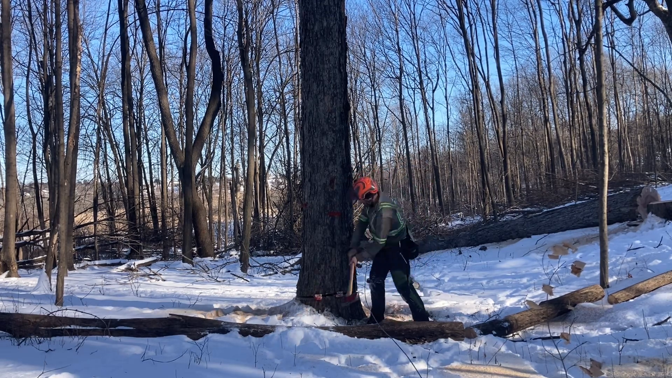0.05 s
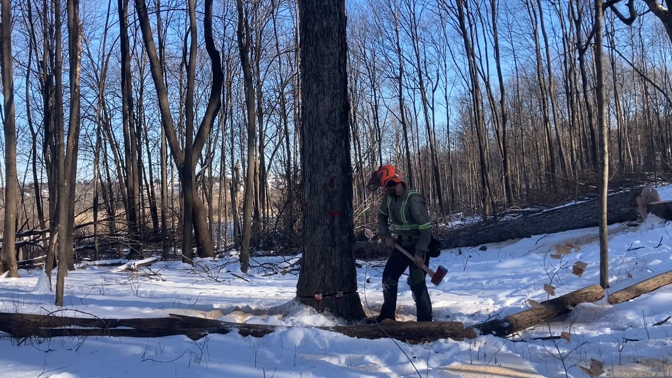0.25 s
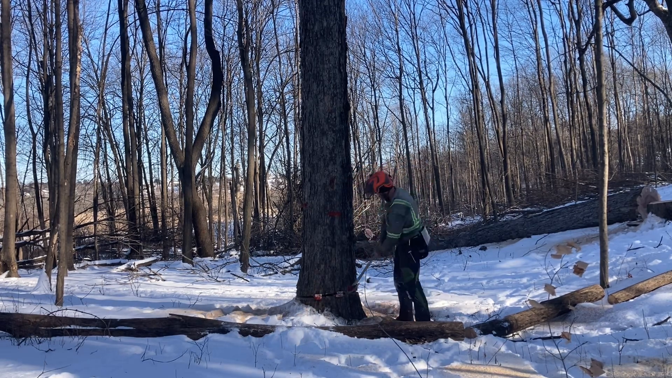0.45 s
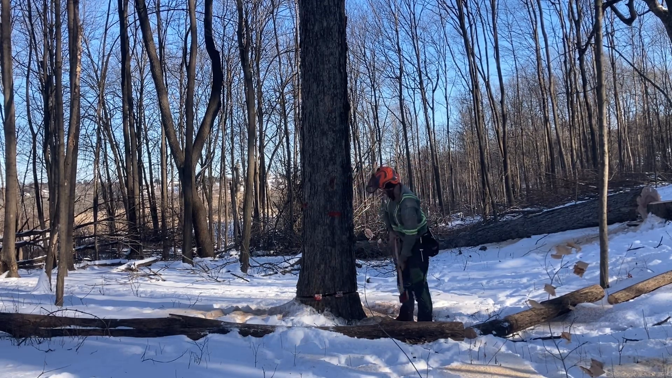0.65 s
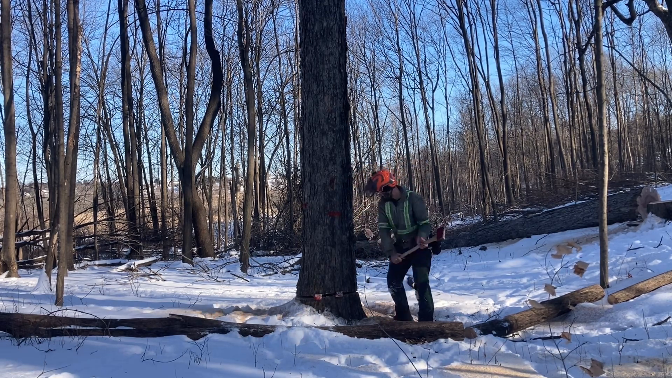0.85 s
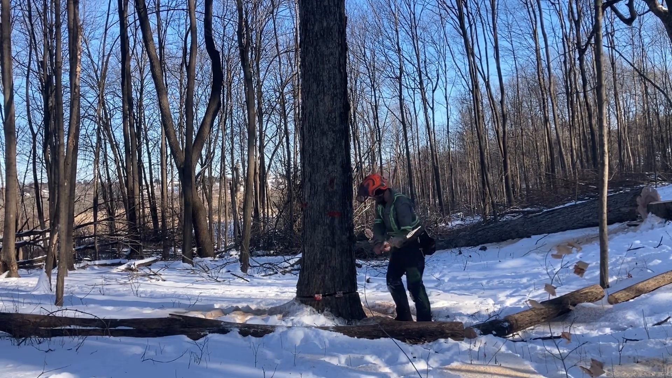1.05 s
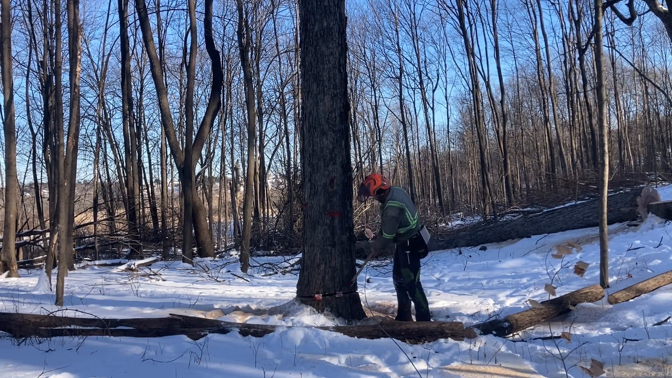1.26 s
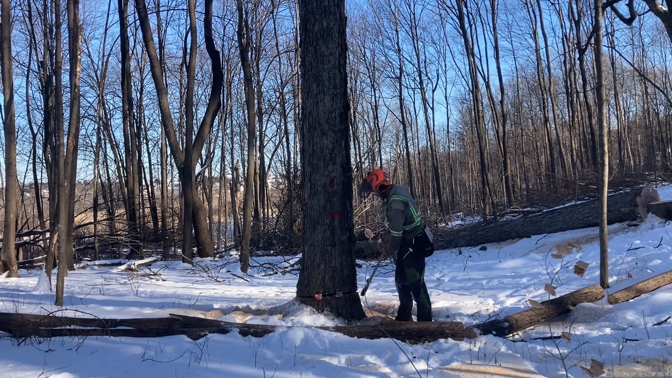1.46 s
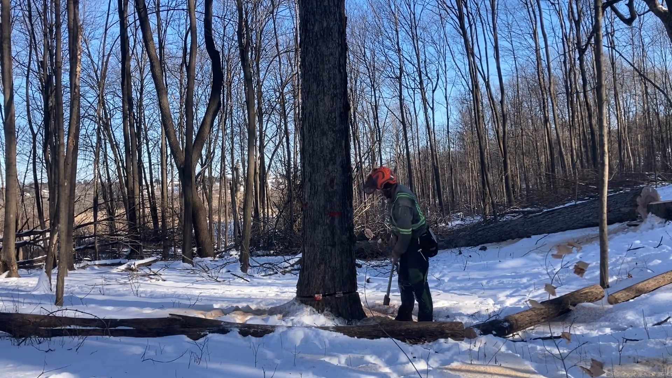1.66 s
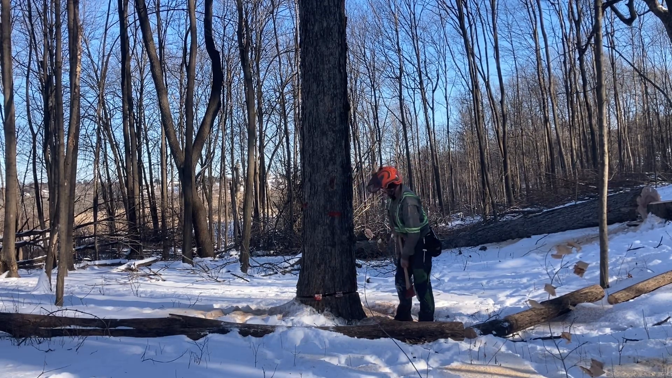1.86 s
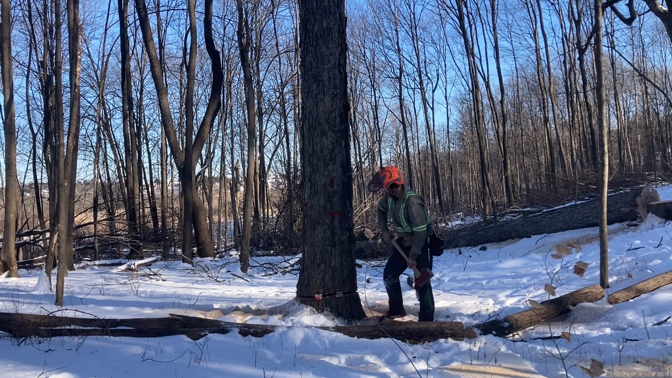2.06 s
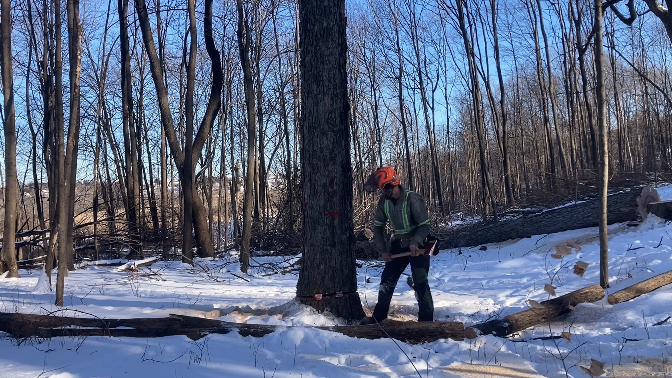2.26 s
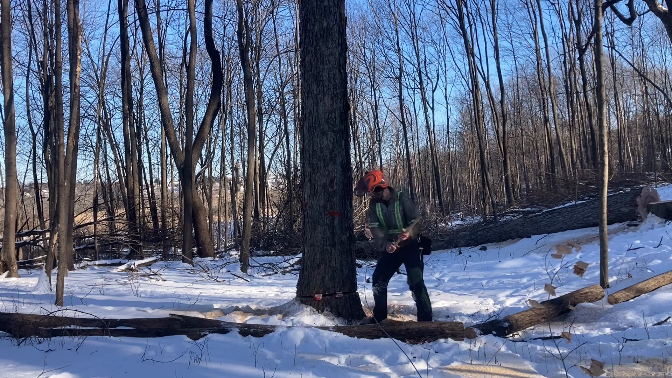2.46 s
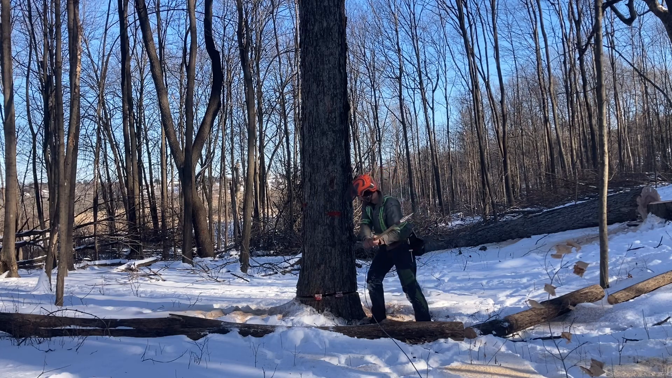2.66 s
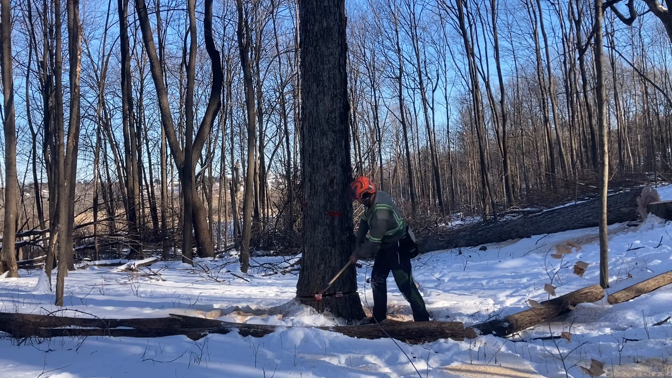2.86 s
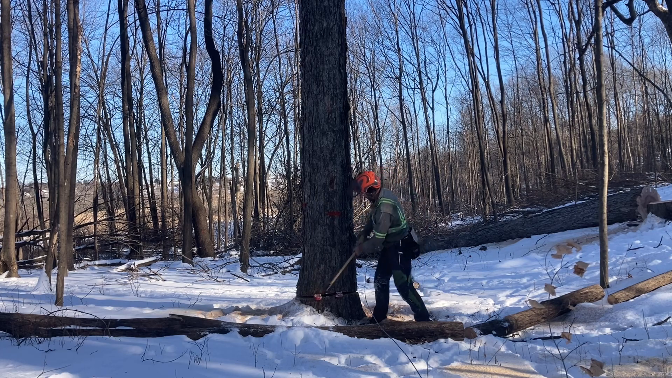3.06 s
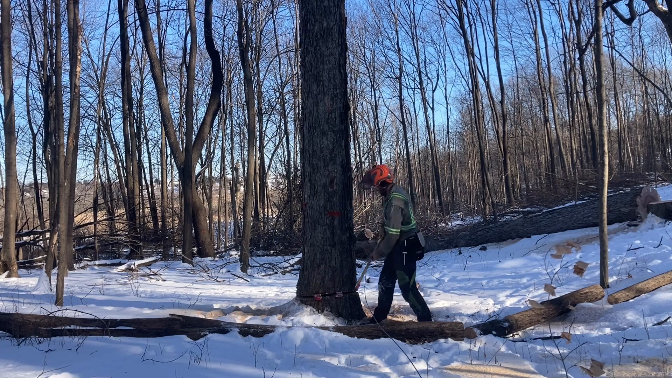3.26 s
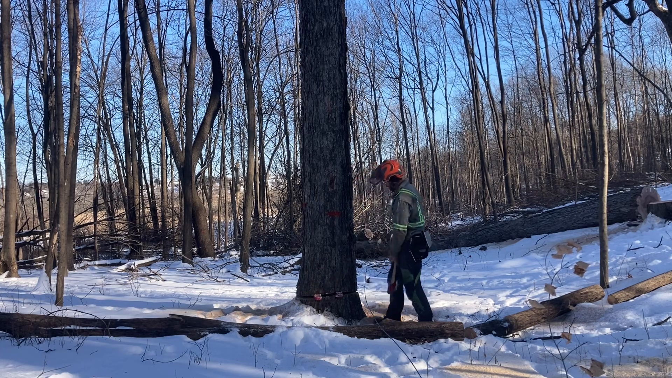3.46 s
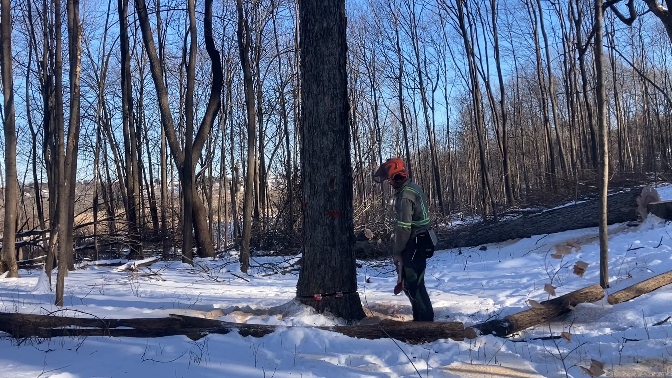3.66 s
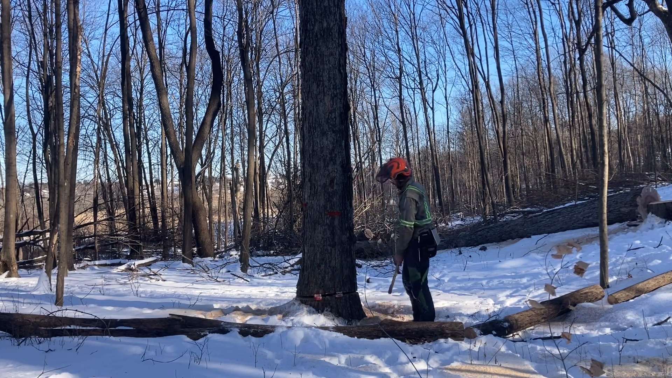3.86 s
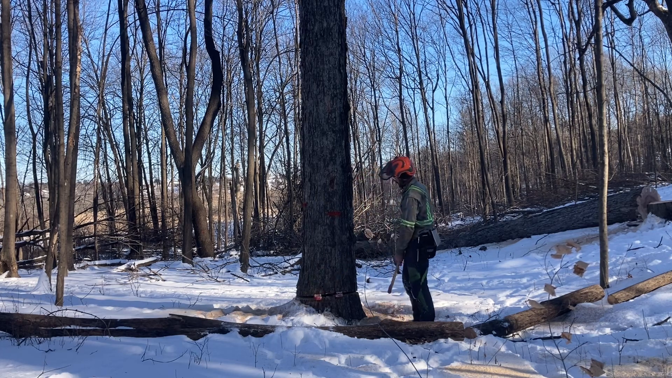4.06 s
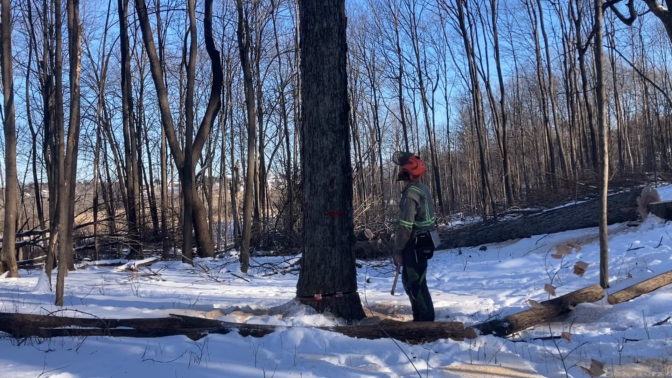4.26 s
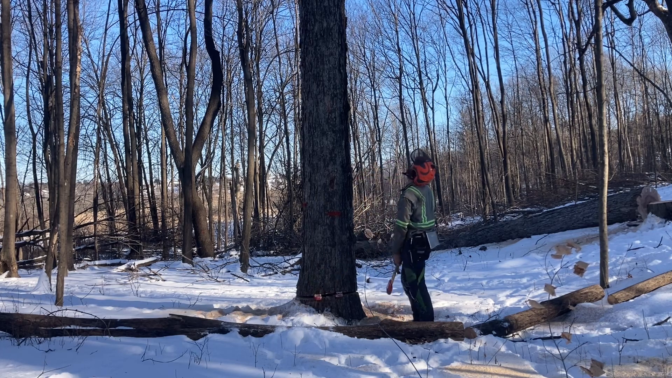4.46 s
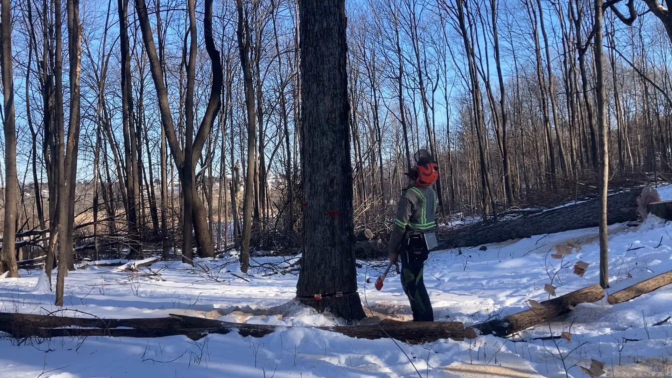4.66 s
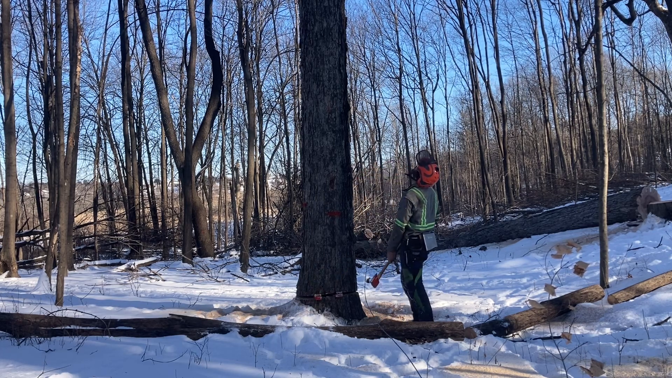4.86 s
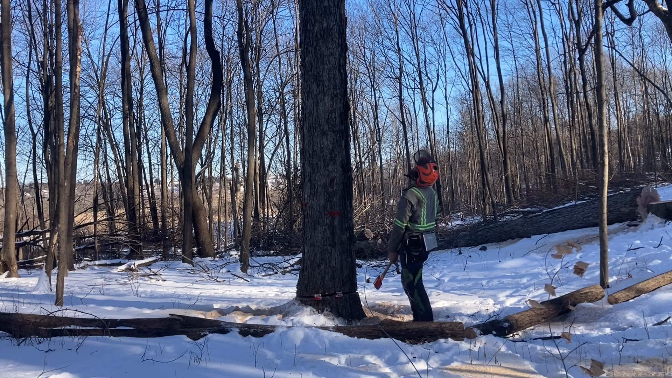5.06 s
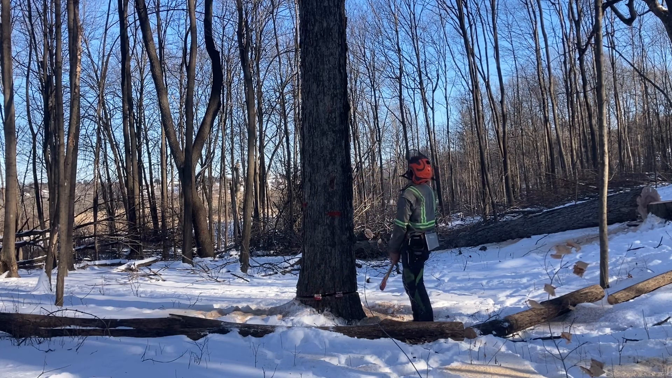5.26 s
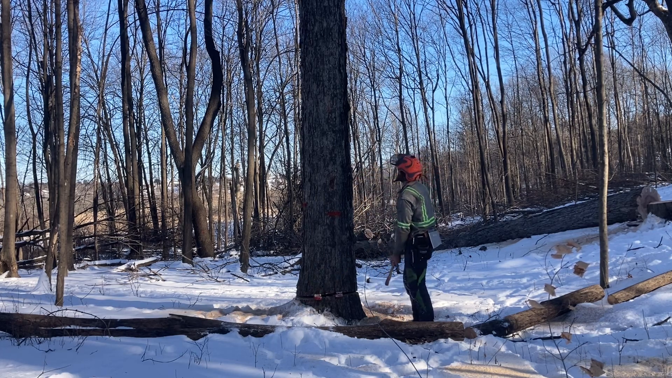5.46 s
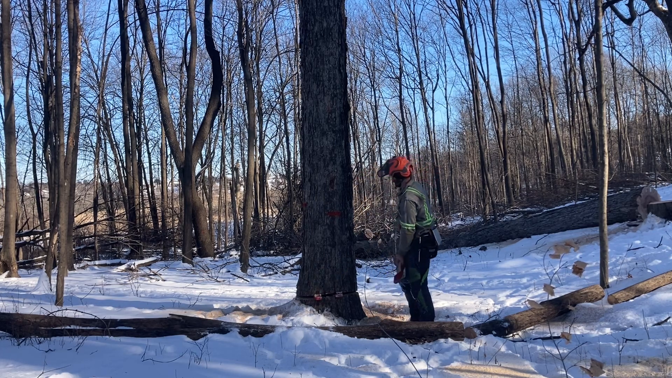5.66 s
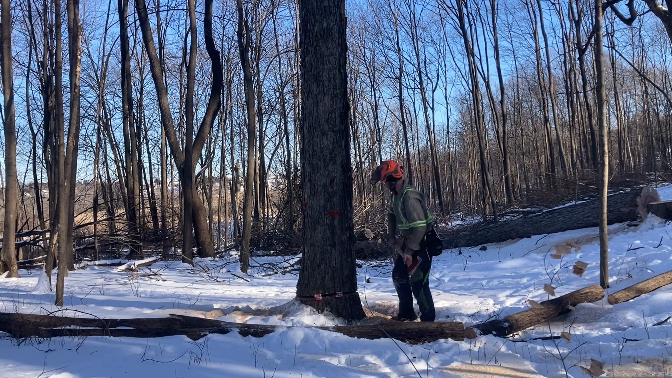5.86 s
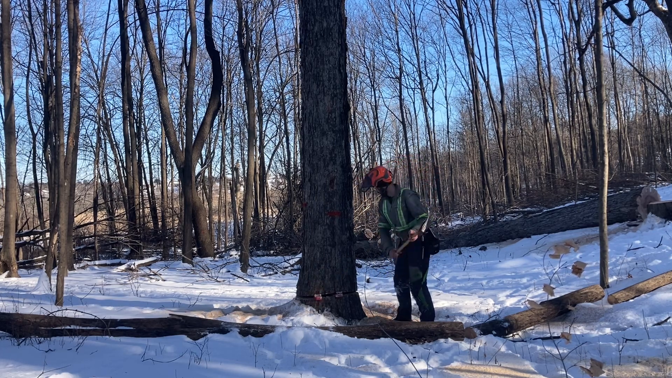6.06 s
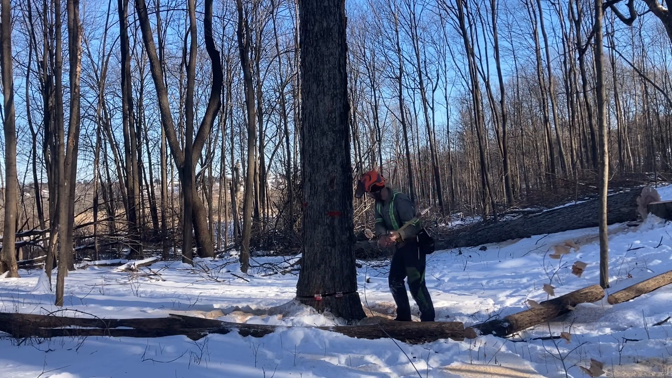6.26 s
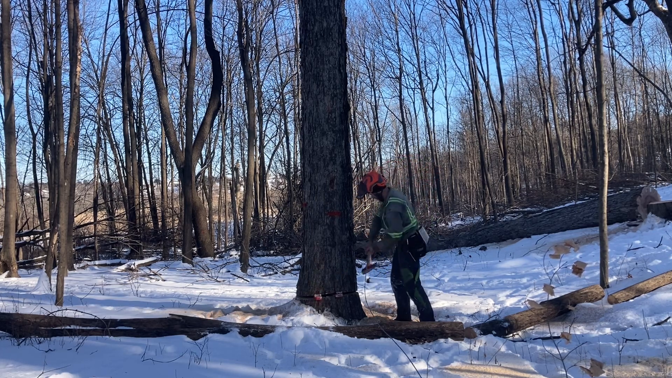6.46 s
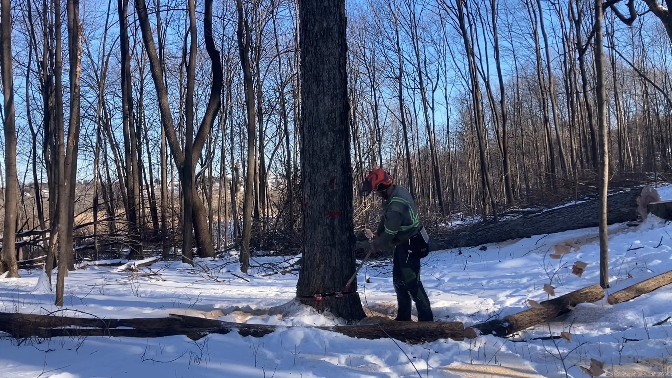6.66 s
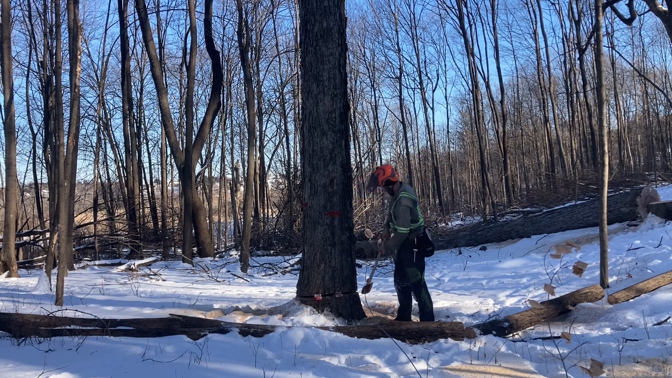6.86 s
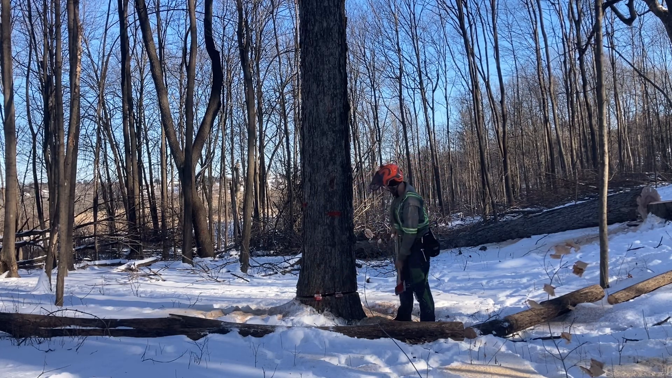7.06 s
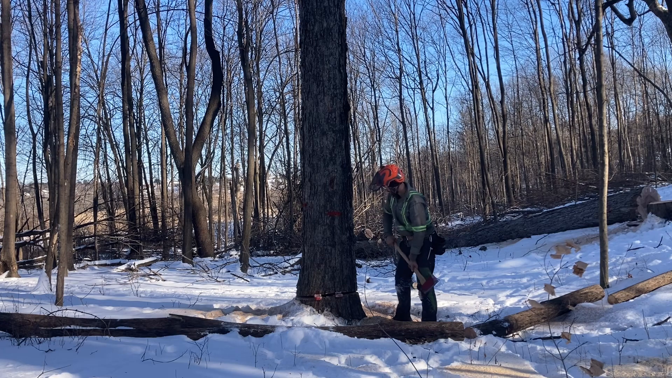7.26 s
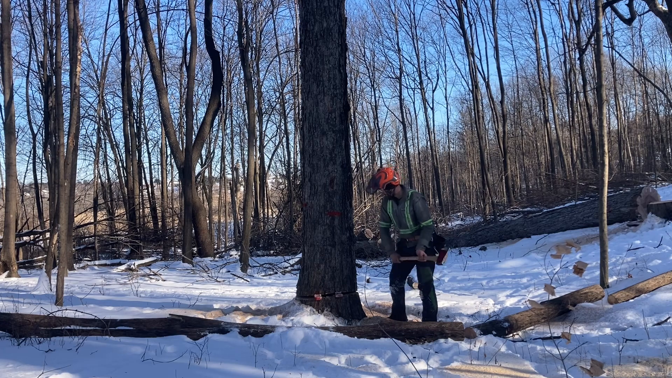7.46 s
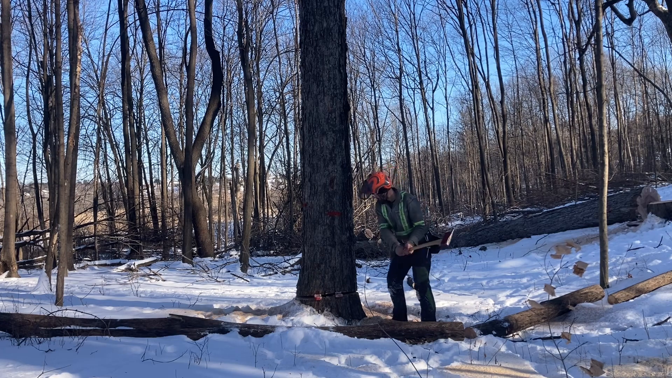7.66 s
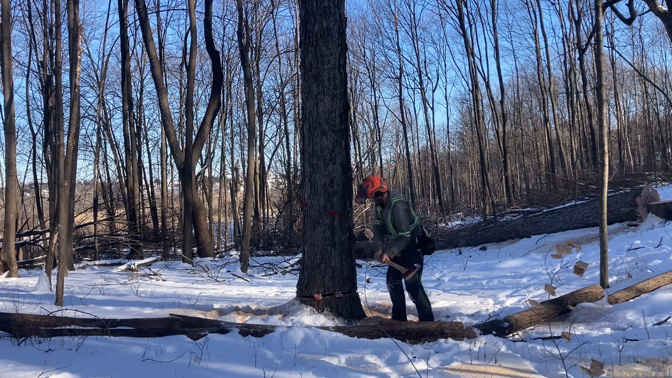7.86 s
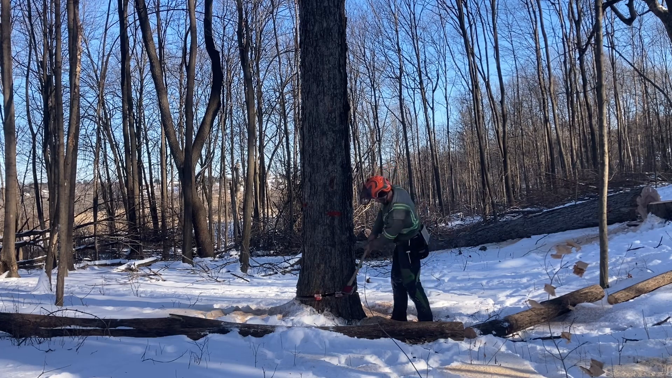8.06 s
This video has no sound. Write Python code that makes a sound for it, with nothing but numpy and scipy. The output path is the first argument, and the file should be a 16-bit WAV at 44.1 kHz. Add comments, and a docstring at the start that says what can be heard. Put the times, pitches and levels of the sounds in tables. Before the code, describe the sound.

Two quick high-pitched raps, then spaced, ringing axe blows on plastic wedges, with woody echoes, wind bumps, small ticks and faint cloth scuffs.

```python
"""Axe and wedges in a winter wood

A steel axe drives plastic wedges into a standing trunk: a rough contact rings wedge and head, the trunk
thuds, and the trees around answer with decaying, coloured noise. Two blows follow a swish of the head.
Wind bumps the microphone over a lumpy buffeting; twigs and crust tick, wood knocks, boots and cloth scuff.
A far hum and hiss lie beneath. The first 0.87 s play four times too fast, so they are higher and shorter."""
import sys
import numpy as np
from scipy import signal
from scipy.fft import rfft, irfft, next_fast_len
from scipy.io import wavfile
from scipy.ndimage import uniform_filter1d, map_coordinates

SR = 44100
rng = np.random.default_rng(int(sys.argv[2]) if len(sys.argv) > 2 else 0)


def log_audio(samples):
    """Write samples as a 16-bit WAV file to the path given in sys.argv[1]."""
    # one column per channel
    frames = np.atleast_2d(samples).T
    # limit to full scale, then quantise
    limited = np.clip(frames, -1, 1)
    pcm = np.round(limited * 32767).astype(np.int16)
    wavfile.write(sys.argv[1], SR, pcm)


N = 358091

# Event times are as heard; tables of modes and decays are at the scene's own pace.
# blows: start_s, wedge_index, pitch_ratio, level_db, thud_db, contact_s, second_mode_db, fourth_mode_hz,
#        fourth_mode_db, modes_near_3khz_db, head_db, echo_db, echo_tilt_db_per_octave,
#        echo_second_mode_db, echo_first_strength (0-1), echo_length_ratio; mode dB add to the wedge's own
BLOWS = [(0.113, 0, 0.99, -5, -20, 0.0052, -0.5, 1997, 6, 5.5, -11, -47, -1, -1.5, 0.18, 0.95),
         (0.503, 1, 0.96, -7.5, -15.5, 0.0082, -2.5, 1639, 5, -1, -5, -48, -2, 4, .05, 1.46),
         (1.238, 0, 1.025, -2.5, -12, 0.0025, 3, 2090, -5, 5.5, -5.5, -44, -1.5, 0, 0.94, 0.83),
         (2.933, 1, 0.97, -3, -23, 0.0043, -4, 1838, 0.5, -1, -12, -46, 0.5, -3, 0.35, 0.87),
         (6.593, 0, .98, -4.5, -17, 0.0036, 0.5, 1940, 2, 0.5, -1.5, -46, -1.5, -3.5, .5, 0.86),
         (8.05, 0, 1.03, -6, -19.5, 0.0034, -1, 2120, 6.5, 2.5, -13, -49, -1, -1, 0.6, 1.07)]
# modes of the two wedges: mode_hz, width_hz, relative_db
WEDGE_MODES = [
    [(627, 45, -17.5), (1020, 120, 1), (1623, 190, -6.5), (1914, 110, 1), (2680, 240, -6), (3051, 400, -9),
     (3698, 250, -5), (6800, 990, -10), (10700, 440, -25.5)],
    [(744, 140, -8), (1205, 120, 2), (1440, 74, -8), (1830, 160, 0), (2379, 84, 2), (3110, 300, 1),
     (3900, 1400, -13.5), (6300, 2600, -12.5), (500, 71, -9.5)],
]
# axe head modes: mode_hz, relative_db, t60_s
HEAD_MODES = [(3600, -15, 0.072), (7100, -27, 0.015)]
# the head's ring in the echo: mode_hz, width_hz, db_over_head_ring
ECHO_HEAD_MODE = (3650, 170, -3.5)
# trunk modes: mode_hz, width_hz, relative_db
TRUNK_MODES = [(154, 32, 0), (216, 33, 2.5), (279, 49, 0), (386, 77, -5.5), (480, 66, -11), (674, 190, -11)]
# low pushes after a blow: delay_s, relative_db
SHUDDER_PUSHES = [(0.032, 2.5), (0.055, -2.5), (0.091, -5.5), (.125, -18), (0.164, -21.5)]
# likeness of the channels in the blow: band_hz, left_right_likeness (0-1)
CRACK_LIKENESS = [(1200, 0.98), (3100, 0.85), (15000, 0.8)]
# phase by which left leads right: band_hz, lead_rad
CRACK_LEAD = [(1500, 0), (6200, 1), (10500, -5.3), (15600, -12)]
# colour of the wood's answer: band_hz, relative_db
ECHO_COLOUR = [(150, 1.5), (550, -3), (800, -7.5), (1500, -8.5), (3000, -14), (4800, -9.5), (7500, -15),
               (11000, -8), (16500, -18)]
# decay of the wood's answer before each blow's length ratio: band_hz, base_t60_s
WOOD_DECAY = [(200, 1.3), (600, 1.3), (1100, 1.3), (2000, 1.2), (3600, 1.1), (7000, 0.85), (14000, 0.55)]
# swings heard before a blow: blow_s, level_db (before the swell)
SWISHES = [(6.593, -61), (8.05, -65)]
# clear wind bumps: start_s, level_db, pitch_hz
BUMPS = [(0.058, -40.5, 280), (0.241, -39, 310), (0.281, -40, 197), (0.348, -39.5, 300),
         (0.375, -39.5, 240), (0.435, -47, 214), (0.485, -41, 255), (0.626, -41, 150), (0.661, -31.5, 164),
         (0.702, -34, 342), (0.708, -36, 133), (0.722, -40, 297), (0.728, -39.5, 113), (0.851, -47, 140),
         (0.87, -46.5, 85), (0.946, -32, 106), (0.979, -45, 66.6), (1.628, -36.5, 69), (1.673, -37, 77),
         (1.801, -41.5, 56), (2.359, -41.5, 83), (3.515, -41.5, 77.5), (4.18, -45.5, 131),
         (4.208, -37.5, 60), (4.289, -37.5, 79.5), (4.35, -46, 68.2), (4.62, -47.5, 115),
         (5.272, -47.5, 60.1), (5.345, -45.5, 66.2), (5.425, -46, 62.1), (5.477, -42, 61.2),
         (5.53, -47, 68.4), (5.86, -47.5, 64), (6.245, -45.5, 59.3), (6.436, -45.5, 59.8),
         (7.018, -40.5, 84.1), (7.146, -44, 59.46), (7.808, -26.5, 88.3)]
# buffeting curve: time_s, level_db
WIND_LEVEL = [(0.0, -55.5), (0.541, -52.5), (0.99, -62), (1.701, -50.5), (1.902, -58.5), (2.829, -56.5),
              (3.75, -61), (4.269, -58), (5.0, -64.5), (6.24, -58.5), (6.72, -51), (7.12, -60.5),
              (8.12, -62.5)]
# buffeting spectrum: band_hz, relative_db_per_hz
GUST_SPECTRUM = [(15, -32.5), (25, -7), (70, -3), (270, -31), (390, -60.5), (660, -120)]
# ticks of twigs, crust and gear: start_s, level_db, high_part_db
TICKS = [(0.717, -67.5, -2.5), (0.976, -58, -4), (1.4306, -50, -6.5), (1.468, -57.5, -3.5),
         (2.313, -35.5, -11), (3.261, -59.5, 9), (3.31, -53, -3), (3.5248, -60, -17), (4.418, -46.5, -6),
         (5.6375, -57, -4), (7.8865, -69.5, 3.5), (7.9868, -62.5, -22)]
# small wooden knocks: start_s, peak_db, pitch_hz
KNOCKS = [(1.074, -57, 712), (2.314, -42, 1152), (2.314, -46, 2608), (4.228, -59.5, 930), (5.01, -68, 1930),
          (6.071, -64, 1600), (6.369, -55.5, 1290), (7.491, -45.5, 477), (7.837, -60, 1320)]
# scuffs of boots and cloth: start_s, length_s, level_db (before the swell), centre_hz
SCUFFS = [(0.911, 0.11, -72.5, 7650), (2.325, 0.2, -76.5, 3870), (2.45, 0.14, -73.5, 6600),
          (3.61, 0.11, -69, 4530), (5.959, 0.15, -84, 2700), (6.163, 0.083, -72.5, 5480),
          (6.199, 0.11, -76.5, 2080), (7.618, 0.089, -77.5, 4470)]
# far hum and hiss spectrum: band_hz, relative_db_per_hz
AIR_SPECTRUM = [(120, -28), (200, -3.5), (606, -10.5), (1470, -30.5), (7060, -38.5), (11600, -38.5),
                (16500, -53.5)]
# likeness of the channels elsewhere: band_hz, left_right_likeness (0-1)
LIKENESS = [(60, 0.66), (290, 0.98), (640, 0.14), (1400, 0.012)]

FAST_RATIO, FAST_UNTIL_S = 4, 0.87
FADE_S = 0.55  # from here the fast wind and hum fade into their normal pace
SLOW_N = N + 3 * SR  # samples at the scene's own pace
STRIKE = 22  # clean first impact against the rough contact
RELEASE_S = 0.01  # t60 of the force after the contact
GRATE_DB, GRATE_T60_S = -11, 0.09
REBOUND_S, REBOUND_DB = 0.0091, -16  # the head touches the wedge again
PAN_DB, BRIGHT_DB_PER_OCTAVE = 1, -0.73  # left over right; spectral tilt
BOOM_DB = -15  # stem shudder, growing half as fast as the thud in dB
BUILD_S, PATCHY_DB = 0.12, 2  # echo build-up time constant; uneven swells
ECHO_WIDTH_RATIO, ECHO_VARIATION = 1.45, 0.25  # wider modes; upper ones vary less per blow
SWING_S, SWING_HZ = 0.15, 2300
LAG_CYCLES = 1.25  # scale of the bass delay
FLICK = 0.2  # a bump's short bright flick against its body
FAINT_BUMPS = 45  # weaker bumps scattered by chance
FAINT_OVER_BUFFET_DB, FAINT_SPREAD_DB = 6.5, 1
FAINT_HZ, FAINT_LOG_SPREAD = 69, 0.6
THIN_HZ, FULL_S = 104.4, 0.88  # normal-pace wind lacks deep bass until it is whole at FULL_S
SCUFF_OCTAVES = 1
AIR_DB = -68
TOP_HZ = 16800


def amp(db):
    """Decibels to amplitude."""
    return 10 ** (np.asarray(db) / 20)


def unit(x):
    """Scales to unit RMS."""
    return x / np.sqrt(np.mean(x ** 2) + 1e-20)


def along(points, hz):
    """Interpolates (Hz, value) points on a log frequency axis."""
    f, v = np.transpose(points)
    return np.interp(np.log(hz + 1), np.log(f + 1), v)


def filtered(x, response):
    """Multiplies the spectrum by a real or complex response of frequency."""
    m = next_fast_len(x.shape[-1] + SR // 4)
    return irfft(rfft(x, m) * response(np.fft.rfftfreq(m, 1 / SR)), m)[..., :x.shape[-1]]


def add(track, sound, start):
    """Mixes a sound into a track from a sample on."""
    part = track[:, start:start + sound.shape[-1]]
    part += sound[..., :part.shape[1]]


def real_sample(heard_s):
    """Sample of a heard moment in the scene at its own pace."""
    return round((heard_s + (FAST_RATIO - 1) * min(heard_s, FAST_UNTIL_S)) * SR)


def played(x):
    """Plays the start fast by resampling, then the rest at normal speed."""
    cut = round(FAST_UNTIL_S * SR)
    start = signal.resample_poly(x[:, :FAST_RATIO * (cut + 99)], 1, FAST_RATIO, axis=1)[:, :cut]
    return np.hstack([start, x[:, FAST_RATIO * cut:]])[:, :N]


def fast_share():
    """Power share of the fast background as it fades into the normal one."""
    return np.interp(np.arange(N) / SR, [FADE_S, FAST_UNTIL_S], [1, 0])


def pair(length, likeness=LIKENESS):
    """Stereo noise whose left-right likeness follows frequency, by weighting mid and side."""
    def weights(hz):
        turn = np.arccos(np.clip(along(likeness, hz), -1, 1)) / 2
        return np.array([np.cos(turn), np.sin(turn)])

    mid, side = filtered(rng.standard_normal((2, length)), weights)
    return np.array([mid + side, mid - side])


def resonances(modes, f):
    """Causal response of (Hz, width Hz, dB) modes with alternating signs."""
    total = 0
    for k, (centre, width, db) in enumerate(modes):
        damping = 1j * f * width
        total = total + (-1) ** k * amp(db) * damping / (centre * centre - f * f + damping)
    return total


def axe():
    """Each blow: direct sound of wedge and head, the trunk's thud, then the wood's answer in its colour."""
    out, t = np.zeros((2, SLOW_N)), np.arange(2 * SR) / SR
    short = t[:SR // 2]
    for blow in BLOWS:
        s, wedge_index, pitch, level_db, thud_db, contact_s, *tone, head_db = blow[:11]
        echo_db, tilt_db, echo_low_db, early, length = blow[11:]
        second_db, fourth_hz, fourth_db, high_db = tone
        wedge = np.array(WEDGE_MODES[round(wedge_index)]) * [pitch, 1, 1]
        modes = struck(wedge, second_db, fourth_hz, fourth_db, high_db)
        direct = amp(level_db - 9) * direct_blow(short, modes, contact_s, head_db)
        # the blow overloads the input, which rounds its tops
        direct = direct / (1 + np.abs(direct / 0.7) ** 4) ** (1 / 4)
        panned = direct * amp([[PAN_DB / 2], [-PAN_DB / 2]])
        add(out, panned + thud(short, thud_db, BOOM_DB + thud_db / 2), real_sample(s))
        far = struck(wedge, echo_low_db, fourth_hz, ECHO_VARIATION * fourth_db, ECHO_VARIATION * high_db)
        far = np.vstack([far, np.add(ECHO_HEAD_MODE, [0, 0, head_db])])
        answer = wood_answer(t, far, tilt_db, early, length)
        add(out, amp(echo_db) * answer / answer[:, :SR // 4].std(), real_sample(s) + 200)
    # fades out before the pace drops and in after it, 0.1 s each
    return played(out) * np.clip(np.abs(np.arange(N) / SR - FAST_UNTIL_S) * 10, 0, 1)


def direct_blow(t, modes, contact_s, head_db):
    """Contact force through the wedge modes, a bright steel-on-plastic snap, the head's ring, a rebound."""
    def wedge_response(f):
        tilt = amp(BRIGHT_DB_PER_OCTAVE * np.log2((f + 100) / 2000))
        lead = np.exp(1j * along(CRACK_LEAD, f) * np.array([[0.5], [-0.5]]))
        return tilt * (amp(-24) + resonances(modes, f)) * lead

    crack = filtered(contact_force(t, contact_s), wedge_response)
    crack = crack / np.sqrt(np.mean(crack[:, :round(contact_s * SR) + 60] ** 2))
    snap = 0.6 * amp(-60 * t / 0.003) * filtered(pair(len(t), CRACK_LIKENESS), lambda f: f > 4500)
    head = amp(head_db) * ring(HEAD_MODES, t, 0.000075)
    again = np.roll(head + amp(REBOUND_DB) * crack, round(REBOUND_S * SR), axis=1) * (t > REBOUND_S)
    return crack + snap + head + again


def contact_force(t, contact_s):
    """A clean impact plus rough, spectrally even force while steel and plastic touch, then grating decay."""
    rise = 1 - np.exp(-t / 0.0004)
    shape = rise * amp(-60 * np.maximum(t - contact_s, 0) / RELEASE_S)
    force = STRIKE * (np.arange(len(t)) == 10) + shape * pair(len(t), CRACK_LIKENESS)
    size = np.linalg.norm(force[0])
    # alternately flatten the spectrum and bound the force
    for _ in range(4):
        z = rfft(force)
        force = np.clip(size * irfft(z / (np.abs(z) + 1e-9), len(t)), -2 * shape, 2 * shape)
    return force + rise * amp(GRATE_DB - 60 * t / GRATE_T60_S) * pair(len(t), CRACK_LIKENESS)


def struck(wedge, second_db, fourth_hz, fourth_db, high_db):
    """A wedge's modes as one blow sounds them: the fourth moves with the grip of the cut."""
    modes = np.array(wedge, float)
    modes[1, 2] += second_db
    modes[3, 0] = fourth_hz
    modes[3, 2] += fourth_db
    modes[4:6, 2] += high_db
    return modes


def ring(modes, t, attack_s):
    """Decaying sines with new strengths and phases at each blow."""
    total = 0
    for hz, db, t60_s in modes:
        strength = amp(db + rng.normal(0, 1.7) - 60 * t / t60_s)
        total = total + strength * np.sin(2 * np.pi * hz * t + rng.uniform(0, 2 * np.pi))
    return (1 - np.exp(-t / attack_s)) ** 2 * total


def thud(t, thud_db, boom_db):
    """The trunk's knock travels slower in the bass and glides down; the stem shudders after it."""
    def trunk(f):
        glide = np.exp(-2j * np.pi * 0.034 * 100 * ((f / 100) ** 0.41) / 0.45)
        return resonances(TRUNK_MODES, f) * (glide + 1 / 2) * (f > 60)

    jolt = np.exp(-t / 0.012) * (1 + 0.26 * pair(len(t), CRACK_LIKENESS))
    tail = 0.47 * amp(-60 * t / 0.18) * pair(len(t), CRACK_LIKENESS)
    knock = filtered(jolt + tail, trunk)
    shudder = 0
    for delay_s, db in SHUDDER_PUSHES:
        cycle = pressure_cycle(t - delay_s - rng.normal(0, 0.0015), 88)
        shudder = shudder + amp(db + rng.normal(0, 0.3, (2, 1))) * cycle
    return amp(thud_db) * knock / np.abs(knock).max() + amp(boom_db) * filtered(shudder, low_cut)


def pressure_cycle(t, hz):
    """One smooth pressure cycle centred on t = 0."""
    return 4 * t * hz * np.exp(-5 * (t * hz) ** 2)


def wood_answer(t, modes, tilt_db, early, length):
    """Forest scattering coloured by the blow; far away the modes add by power."""
    def tone(f):
        colour = amp(along(ECHO_COLOUR, f) + tilt_db * np.log2((f + 100) / 2000))
        wide = modes * [1, ECHO_WIDTH_RATIO, 1]
        power = amp(-32) + sum(np.abs(resonances([mode], f)) ** 2 for mode in wide)
        return colour * np.sqrt(power)

    return filtered(forest(t, early, length), tone)


def forest(t, early, length):
    """Scattering trunks: noise builds up as more are reached, then each band dies at its own speed."""
    hz, u, z = signal.stft(pair(len(t)), SR, nperseg=512)

    def uneven(bins, frames):
        noise = uniform_filter1d(rng.standard_normal(z.shape[1:]), bins, 0)
        return unit(uniform_filter1d(noise, frames, 1))

    decay_db = -60 * u / length / along(WOOD_DECAY, hz)[:, None]
    build = early + (1 - np.exp(-u / BUILD_S)) ** 2
    shape = amp(1.1 * uneven(4, 50) + decay_db) * build
    patches = amp(PATCHY_DB * uneven(9, 5))  # groups of trunks answer
    return signal.istft(z * shape * patches, SR, nperseg=512)[1][:, :len(t)]


def swings():
    """The head's swish through air: band noise that grows up to the blow."""
    out, n = np.zeros((2, N)), round(SWING_S * SR)
    for s, level_db in SWISHES:
        band = lambda hz: amp(-5 * np.log2((hz + 50) / SWING_HZ) ** 2)
        hiss = filtered(rng.standard_normal((2, n)), band)
        add(out, amp(level_db) * unit(hiss) * (np.arange(n) / n) ** 3.5, round(s * SR) - n)
    return out


def ticks():
    """Short broad snaps and small hollow knocks, each with a faint wash from the nearest trees."""
    out, t = np.zeros((2, N)), np.arange(SR // 4) / SR

    def burst(t60_s, wash_db):
        wash = pair(len(t)) * amp(wash_db - 60 * t / 0.18)
        return rng.standard_normal(len(t)) * amp(-60 * t / t60_s) + wash

    for s, db, high_db in TICKS:
        colour = [(500, -27), (1500, 1), (5000, -3.5), (8000, high_db + 0.5), (16000, high_db + 6)]
        snap = filtered(burst(0.0145, wash_db=-18.5), lambda hz: amp(along(colour, hz)))
        add(out, amp(db + 6) * snap, round(s * SR))
    for s, peak_db, hz in KNOCKS:
        hit = burst(0.013, wash_db=-31.5) * (1 - np.exp(-t * hz))
        knock = filtered(hit, lambda f: resonances([(hz, 0.4 * hz, 0)], f) ** 2)
        add(out, amp(peak_db) * knock / np.abs(knock).max(), round(s * SR))
    return out


def scuffs():
    """Boots and cloth: brief grainy band noise that swells and fades."""
    out = np.zeros((2, N))
    for s, length_s, level_db, centre_hz in SCUFFS:
        n = round(length_s * SR)
        grain = np.exp(0.4 * unit(uniform_filter1d(rng.standard_normal(n), 60)))
        band = lambda hz: amp(-5 * (np.log2((hz + 50) / centre_hz) / SCUFF_OCTAVES) ** 2)
        hiss = filtered(rng.standard_normal((2, n)) * grain, band)
        swell = np.sin(np.pi * np.arange(n) / n) ** 0.63
        add(out, amp(level_db) * unit(hiss) * swell, round(s * SR))
    return out


def wind():
    """Single eddies bump the microphone over a lumpy low buffeting; both pass from fast to normal pace."""
    quick_bumps, normal_bumps = bumps()
    buffet = buffeting()
    time_s = np.arange(N) / SR
    level = amp(np.interp(time_s, *np.transpose(WIND_LEVEL)))
    port = lambda hz: low_cut(hz) * low_lag(hz)
    fast_buffet = played(filtered(buffet, lambda hz: low_cut(2 * hz)))
    fast = played(filtered(quick_bumps, port)) + level * np.sqrt(fast_share()) * fast_buffet
    slow = filtered(normal_bumps, port) + level * np.sqrt(1 - fast_share()) * buffet[:, -N:]
    thin = filtered(slow, lambda hz: 1 / (1 + (THIN_HZ / (hz + 1)) ** 4))
    whole = np.clip((time_s - FULL_S) * 10 + 1, 0, 1)
    return fast + whole * slow + (1 - whole) * thin


def bumps():
    """Pressure puffs on fast and normal tracks, uneven in time and level on the microphone's two ports."""
    quick, normal = np.zeros((2, SLOW_N)), np.zeros((2, N))
    t = np.arange(-2000, 2000) / SR
    for s, db, hz in BUMPS + faint_bumps():
        track, start = normal, round(s * SR)
        if s < FADE_S:
            track, start, hz = quick, real_sample(s), hz / FAST_RATIO
        eddy = puff(t + rng.normal(0, 0.0008, (2, 1)), hz) + FLICK * puff(t + 0.3 / hz, 2.4 * hz)
        # start earlier by the delay low_lag gives at this pitch
        late = round(SR * LAG_CYCLES * 400 / ((hz + 5) * (hz + 405)))
        level = 1.7 * amp(db + rng.normal(0, 1 / 2, (2, 1)))
        add(track, level * eddy, max(start - 2000 - late, 0))
    return quick, normal


def faint_bumps():
    """Weaker bumps at jittered times, their levels following the buffeting."""
    faint = []
    for k, (jitter, level, pitch) in enumerate(rng.standard_normal((FAINT_BUMPS, 3))):
        s = max(k + 0.5 + 0.18 * jitter, 0) * N / SR / FAINT_BUMPS
        db = np.interp(s, *np.transpose(WIND_LEVEL)) + FAINT_OVER_BUFFET_DB + FAINT_SPREAD_DB * level
        hz = FAINT_HZ * np.exp(FAINT_LOG_SPREAD * pitch) * (FAST_RATIO if s < FADE_S else 1)
        faint.append((s, db, hz))
    return faint


def puff(t, hz):
    """A pressure peak between two dips, centred on t = 0."""
    u = 7 * (t * hz) ** 2
    return (1 - 2 * u) * np.exp(-u)


def buffeting():
    """Low stereo noise at unit RMS, its level wandering through 20 random knots a second."""
    knots = rng.standard_normal(SLOW_N * 20 // SR + 4)
    lumps = amp(4 * map_coordinates(knots, [np.arange(SLOW_N) * 20 / SR]))
    return unit(filtered(lumps * pair(SLOW_N), lambda hz: amp(along(GUST_SPECTRUM, hz))))


def low_cut(hz):
    """The microphone's steep bass cut."""
    return 1 / np.sqrt(1 + (47 / (hz + 1)) ** 10)


def low_lag(hz):
    """Phase that delays low tones, so a bump glides down."""
    return np.exp(2j * np.pi * LAG_CYCLES * np.log(1 + 400 / (hz + 5)))


def air():
    """The valley's quiet hum and a faint hiss: shaped noise, its fast, brighter form fading into the normal."""
    hum = amp(AIR_DB) * unit(filtered(pair(SLOW_N), lambda hz: amp(along(AIR_SPECTRUM, hz))))
    fast = amp(-1.5) * np.sqrt(fast_share()) * played(hum)
    return fast + np.sqrt(1 - fast_share()) * hum[:, -N:]


def scene():
    """Sums all layers."""
    return axe() + swings() + wind() + air() + ticks() + scuffs()


def record(dry):
    """Softens the treble and keeps nothing above the band limit."""
    def response(hz):
        soft = amp(-5 * np.clip(hz / 12000 - 1, 0, 1) / 0.27)
        return soft * np.clip((TOP_HZ - hz) / 400, 0, 1) ** 2

    return filtered(dry, response)


dry = scene()
out = record(dry)
log_audio(out)
```